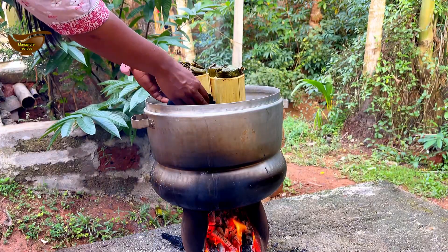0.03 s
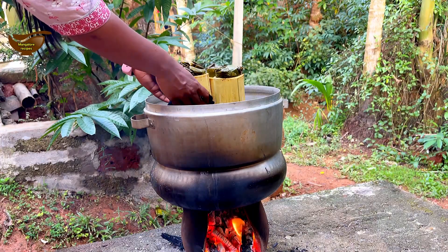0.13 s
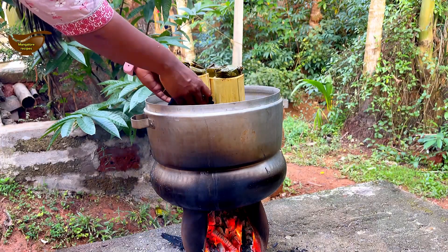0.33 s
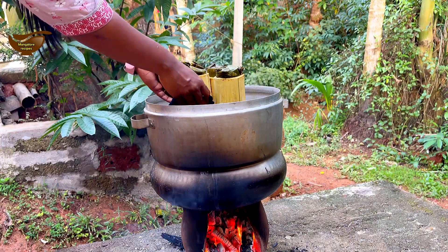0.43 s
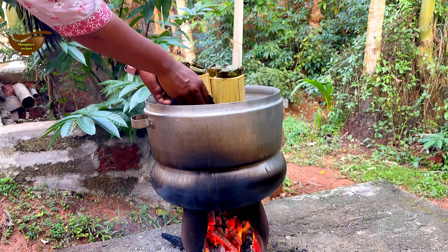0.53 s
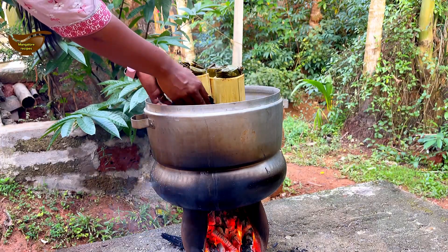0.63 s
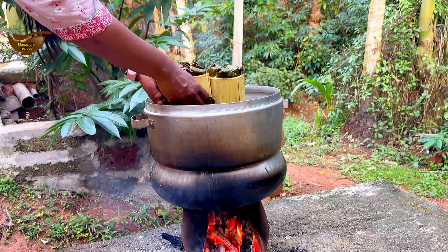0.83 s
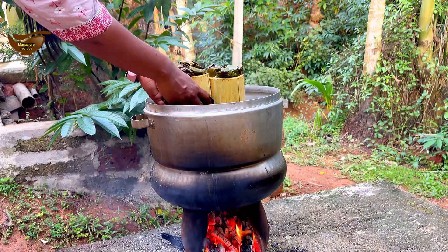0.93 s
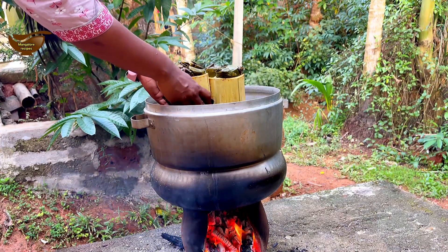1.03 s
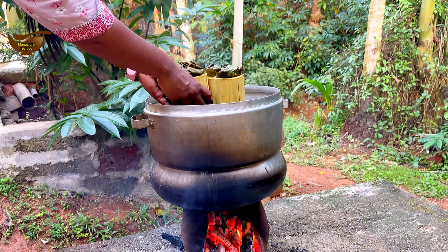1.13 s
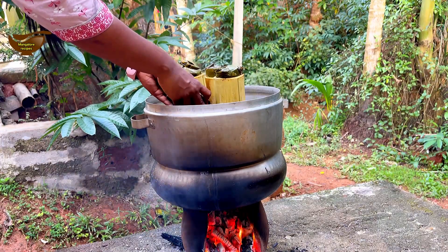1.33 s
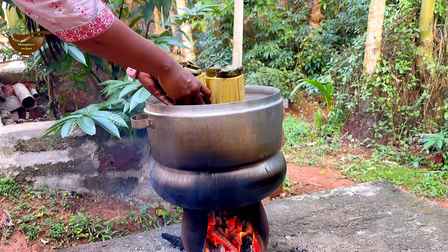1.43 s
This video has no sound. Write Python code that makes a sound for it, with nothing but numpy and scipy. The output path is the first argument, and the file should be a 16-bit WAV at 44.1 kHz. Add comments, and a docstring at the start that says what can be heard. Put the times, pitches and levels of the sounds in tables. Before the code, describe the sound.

A nearby bird holds a pure whistle, slides it upward and ends in four quick chips. Farther birds answer and an insect buzzes twice, over steady insect hiss and a faint low rumble in a wooded garden.

```python
"""Edge of a wooded garden. A near bird holds a pure whistle, slides it upward and ends in four
quick chips; trunks and leaves scatter the sound. Farther birds answer with arched notes and an
insect buzzes twice in bursts of narrow-band noise. Behind: steady insect hiss, a wash of distant
birds, a swelling bright hiss, outdoor air, a faint low rumble and a hum."""
import sys
import numpy as np
from scipy import signal
from scipy.fft import rfft, irfft
from scipy.io import wavfile

SR = 44100
rng = np.random.default_rng(int(sys.argv[2]) if len(sys.argv) > 2 else 0)


def waveform_to_disk(signal):
    """Save audio, clipped to [-1, 1], as 16-bit WAV at the path in sys.argv[1]."""
    frames = np.transpose(np.atleast_2d(signal))
    scaled = np.clip(frames, -1, 1) * 32767
    samples = np.round(scaled).astype(np.int16)
    wavfile.write(sys.argv[1], SR, samples)


N = 66150
T = np.arange(N) / SR

# near bird, two notes: (time [s], pitch [Hz], level [dB])
HELD_NOTE = [(.19, 2050, -55), (.21, 2198, -40.5), (.224, 2312, -27.5), (.248, 2353, -21),
             (.254, 2336, -31), (.263, 2379, -19.5), (.277, 2322, -33.5), (.286, 2370, -39),
             (.298, 2372, -28), (.307, 2370, -31), (.318, 2372, -24), (.333, 2335, -40)]
RISING_NOTE = [(.332, 2420, -33), (.345, 2597, -37), (.355, 2761, -29), (.378, 2812, -24),
               (.388, 2894, -23.5), (.407, 2963, -24.5), (.418, 3050, -25), (.43, 3082, -25),
               (.448, 3175, -23), (.468, 3123, -25), (.483, 3172, -22.5), (.49, 3170, -30),
               (.511, 3037, -32), (.519, 3160, -40)]
# near bird, chips: (start [s], length [s], level [dB])
CHIPS = [(.589, 0.012, -32.5), (.601, 0.0088, -25), (.632, 0.01135, -30.5), (.643, 0.01654, -27)]
# farther birds; thin high notes of small birds:
# (start [s], length [s], first [Hz], middle [Hz], last [Hz], level [dB], pitch waver [ratio])
FAR_NOTES = [(0, .028, 1515, 1586, 1600, -44, .003), (0, 0.046, 3088, 3013, 2820, -45.5, 0.039),
             (.03, 0.055, 2766, 2816, 2810, -47.5, 0.0046), (.11, 0.083, 2950, 3015, 3170, -48, 0.0096),
             (.61, 0.038, 1660, 1646, 1590, -53, 0.0079), (.72, 0.079, 1767, 1724, 1763, -53.5, 0.0046),
             (.755, 0.1063, 2290, 2297, 2354, -41, 0.0403), (.862, .048, 1770, 1805, 1870, -49, 0.0118),
             (.905, 0.035, 1860, 1892, 1890, -46, 0.0052), (.988, 0.082, 2980, 3080, 3124, -41, 0.013),
             (1.023, 0.0087, 3100, 3170, 3280, -32, 0.0046), (1.03, 0.085, 3300, 3410, 3352, -48, .014),
             (1.115, 0.0327, 2040, 1915, 1800, -43.5, 0.0198), (1.053, .06, 2070, 2182, 2194, -38.5, .012),
             (1.1, .018, 2210, 2203, 2150, -33.5, .006), (1.122, 0.038, 3327, 3186, 2940, -37, .015),
             (1.19, 0.083, 1583, 1550, 1486, -59.5, 0.0067),
             (1.206, 0.021, 3200, 2868, 2620, -34.5, 0.0034), (1.36, 0.13, 2877, 2787, 2806, -50.5, 0.0043)]
HIGH_NOTES = [(.572, 0.076, 4594, 4980, 5260, -56.5, 0.029), (.586, 0.015, 5020, 4980, 4840, -45.5, .008),
              (.676, 0.026, 3980, 3980, 3880, -54, .01), (.68, 0.031, 4680, 4560, 4440, -55, .035),
              (.822, 0.022, 4520, 4600, 4460, -53.5, 0.0077), (1.04, 0.082, 5320, 5220, 5110, -64, 0.0054)]
# insect buzzes: (centre [s], Gaussian sigma [s], peak level [dB])
BUZZES = [(0.747, 0.042, -52.5), (0.918, 0.078, -59.5)]
# noise spectra: (frequency [Hz], relative density [dB])
INSECT_SPECTRUM = [(3300, -47), (3950, -2.5), (5100, 3.5), (5900, -10.5), (7200, 1), (8700, 6), (9300, 3.5),
                   (10000, -9), (11600, 5), (13000, -7), (14300, 2.5), (15700, -9)]
CHORUS_SPECTRUM = [(1400, -19.5), (1900, -11), (2200, 4.5), (2600, -1), (3100, 4.5), (3350, -2.5),
                   (3600, -30)]
HISS_SPECTRUM = [(1500, -13), (3500, 5), (9000, 0.5), (15700, 0.5)]
AIR_SPECTRUM = [(22, 0), (35, 14.5), (55, 8), (90, 6), (130, 2.5), (320, 3), (480, -1), (700, -4),
                (1050, 0), (1450, -3.5), (3200, -12), (3800, -39)]
# envelopes: (time [s], level [dB])
INSECT_LEVEL = [(0, -62), (.55, -60.5), (.7, -60), (.9, -62), (1.15, -59.5), (1.3, -63.5), (1.5, -60.5)]
CHORUS_LEVEL = [(0, -49), (.3, -47.5), (.52, -39.5), (.6, -36.5), (.7, -44), (.92, -49.5), (1.15, -41),
                (1.33, -50.5), (1.5, -52)]
HISS_LEVEL = [(0, -69), (.1, -57), (.26, -52), (.3, -56.5), (.39, -54.5), (.48, -53), (.53, -72),
              (.6, -64.5)]
RUMBLE_LEVEL = [(0.0, -48), (0.062, -56), (0.128, -43.5), (0.188, -48), (0.216, -53.5), (0.512, -44.5),
                (0.614, -58), (0.642, -48.5), (0.714, -60), (0.834, -44.5), (0.864, -55.5), (1.102, -44),
                (1.282, -59), (1.31, -46), (1.462, -51), (1.5, -40.5)]
# hum partials: (frequency [Hz], level [dB])
HUM_PARTIALS = [(246.5, -61.5), (296, -62.5), (441, -71)]

WAVER_RATE_HZ, FLUTTER_RATE_HZ = 148, 190
CHIP_FROM_HZ, CHIP_TO_HZ = 1800, 3510
WOOD_T60_S, WOOD_BUILD_S = .77, .0072
BUZZ_HZ, BUZZ_HALF_BAND_HZ = 7610, 1940
AIR_DB, RUMBLE_HZ, CUTOFF_HZ = -53, 62.5, 15720


def whistle(note, waver_ratio, flutter_ratio, echo_db):
    """Near bird: one sine with fast pitch waver and amplitude flutter, plus echoes."""
    flutter = np.abs(1 + flutter_ratio * drift(FLUTTER_RATE_HZ))
    envelope = from_db(curve(note, column=2)) * flutter * gate(note[0][0], note[-1][0], edge_s=.0028)
    direct = envelope * wavering_tone(curve(note), waver_ratio, WAVER_RATE_HZ)
    return direct + near_echoes(direct, echo_db, latest_s=.035) + wood_tail(direct, relative_db=-10)


def chips():
    """Near bird: each chip sweeps up almost an octave, plus echoes."""
    direct = np.zeros(N)
    for start_s, length_s, level_db in CHIPS:
        end_s = start_s + length_s
        pitch_hz = np.interp(T, [start_s, end_s], [CHIP_FROM_HZ, CHIP_TO_HZ])
        direct += from_db(level_db) * tone(pitch_hz) * gate(start_s, end_s, edge_s=length_s / 2)
    echoes = near_echoes(direct, relative_db=-4, latest_s=.014)
    return direct + echoes + wood_tail(direct, relative_db=-2.5)


def near_echoes(direct, relative_db, latest_s, count=14):
    """Sparse reflections from ground, wall and near trunks."""
    response = np.zeros(N)
    delays_s = rng.uniform(.003, latest_s, count)
    response[(delays_s * SR).astype(int)] = rng.standard_normal(count)
    return scatter(direct, response, relative_db)


def wood_tail(direct, relative_db):
    """Dense leaf echoes: fast build, exponential decay."""
    envelope = (1 - np.exp(-T / WOOD_BUILD_S)) * from_db(-60 * T / WOOD_T60_S)
    return scatter(direct, rng.standard_normal(N) * envelope, relative_db)


def far_birds(notes, tail_db):
    """Whistles on parabolic pitch arcs, half lost in leaf echoes."""
    direct = np.zeros(N)
    for start_s, length_s, first_hz, middle_hz, last_hz, level_db, waver_ratio in notes:
        progress = np.clip((T - start_s) / length_s, 0, 1)
        parabola = np.polyfit([0, .5, 1], [first_hz, middle_hz, last_hz], 2)
        pitch_hz = np.polyval(parabola, progress)
        envelope = from_db(level_db) * gate(start_s, start_s + length_s, min(.0071, length_s / 2))
        direct += envelope * wavering_tone(pitch_hz, waver_ratio, WAVER_RATE_HZ)
    return direct + wood_tail(direct, tail_db)


def insect_buzzes():
    """Narrow-band noise in two Gaussian swells."""
    band = noise([(BUZZ_HZ - BUZZ_HALF_BAND_HZ, -30), (BUZZ_HZ, 0), (BUZZ_HZ + BUZZ_HALF_BAND_HZ, -36)])
    envelope = sum(from_db(peak_db) * np.exp(-.5 * ((T - centre_s) / sigma_s) ** 2)
                   for centre_s, sigma_s, peak_db in BUZZES)
    return envelope * band


def insect_hiss():
    """Steady high noise, slight level flicker."""
    flicker_db = .63 * drift(rate_hz=27)
    return from_db(curve(INSECT_LEVEL) + flicker_db) * noise(INSECT_SPECTRUM)


def chorus():
    """Distant birds merged into a noise wash."""
    return from_db(curve(CHORUS_LEVEL)) * noise(CHORUS_SPECTRUM)


def bright_hiss():
    """Grainy hiss; swells, then drops away."""
    grain_db = 1.5 * drift(rate_hz=400)
    return from_db(curve(HISS_LEVEL) + grain_db) * noise(HISS_SPECTRUM)


def background():
    """Outdoor air noise, wavering low rumble, three-partial hum."""
    rumble = from_db(curve(RUMBLE_LEVEL)) * wavering_tone(RUMBLE_HZ, waver_ratio=.032, rate_hz=10)
    hum = sum(from_db(level_db) * wavering_tone(pitch_hz, waver_ratio=.0015, rate_hz=3.3)
              for pitch_hz, level_db in HUM_PARTIALS)
    return from_db(AIR_DB) * noise(AIR_SPECTRUM) + rumble + hum


def from_db(db):
    """Decibels to gain."""
    return 10 ** (np.asarray(db) / 20)


def rms(x):
    """Root mean square."""
    return np.sqrt(np.mean(x ** 2) + 1e-20)


def curve(rows, column=1):
    """Table column, linearly interpolated over time."""
    rows = np.array(rows)
    return np.interp(T, rows[:, 0], rows[:, column])


def drift(rate_hz, hop=16):
    """Random signal low-passed at rate_hz, rms 1."""
    count = N // hop + 2
    lowpass = signal.butter(4, rate_hz, fs=SR / hop, output="sos")
    settled = signal.sosfilt(lowpass, rng.standard_normal(2 * count))[count:]
    return np.interp(np.arange(N) / hop, np.arange(count), settled / rms(settled))


def noise(spectrum):
    """Coloured noise, rms 1."""
    hz, db = np.transpose(spectrum)
    bins_hz = np.maximum(np.fft.rfftfreq(N, 1 / SR), 1)
    colour = from_db(np.interp(np.log(bins_hz), np.log(hz), db, left=-60, right=-60))
    shaped = irfft(rfft(rng.standard_normal(N)) * colour, N)
    return shaped / rms(shaped)


def tone(pitch_hz):
    """Sine on a pitch track, random phase, rms 1."""
    return np.sqrt(2) * np.sin(2 * np.pi * (np.cumsum(pitch_hz) / SR + rng.random()))


def wavering_tone(pitch_hz, waver_ratio, rate_hz):
    """Sine with random pitch deviation; waver_ratio is its rms share."""
    return tone(pitch_hz * (1 + waver_ratio * drift(rate_hz)))


def gate(start_s, end_s, edge_s):
    """Window with sine-squared edges."""
    ramp = np.clip(np.minimum(T - start_s, end_s - T) / edge_s, 0, 1)
    return np.sin(np.pi / 2 * ramp) ** 2


def scatter(direct, response, relative_db):
    """Echoes only, rms set relative to the direct sound."""
    wet = signal.fftconvolve(direct, response)[:N]
    return wet * from_db(relative_db) * rms(direct) / rms(wet)


def scene():
    """All sources, mono."""
    held = whistle(HELD_NOTE, waver_ratio=.0032, flutter_ratio=.022, echo_db=-20)
    rising = whistle(RISING_NOTE, waver_ratio=.01895, flutter_ratio=.21, echo_db=-6.5)
    near = held + rising + chips()
    far = far_birds(FAR_NOTES, tail_db=-3) + far_birds(HIGH_NOTES, tail_db=-1)
    insects = insect_buzzes() + insect_hiss()
    return (near + far + insects + chorus() + bright_hiss() + background())[None]


def record(dry):
    """Steep elliptic low-pass."""
    return signal.sosfilt(signal.ellip(12, .1, 90, CUTOFF_HZ, fs=SR, output="sos"), dry)


dry = scene()
out = record(dry)
waveform_to_disk(out)
```